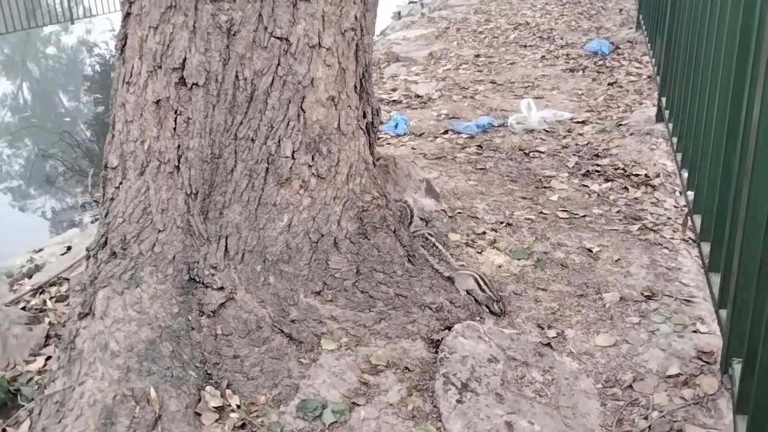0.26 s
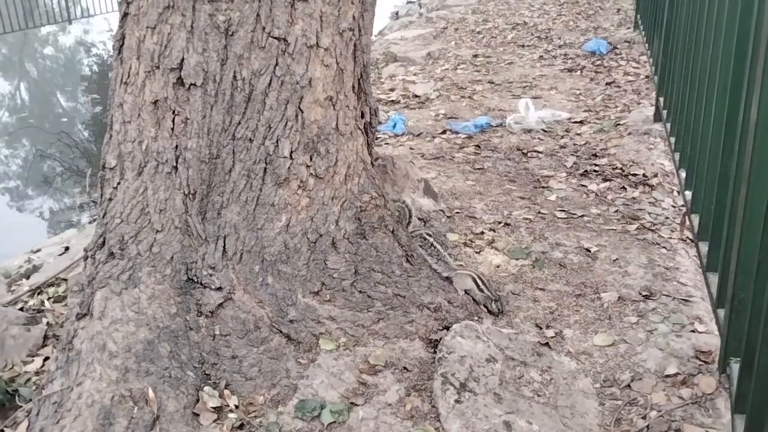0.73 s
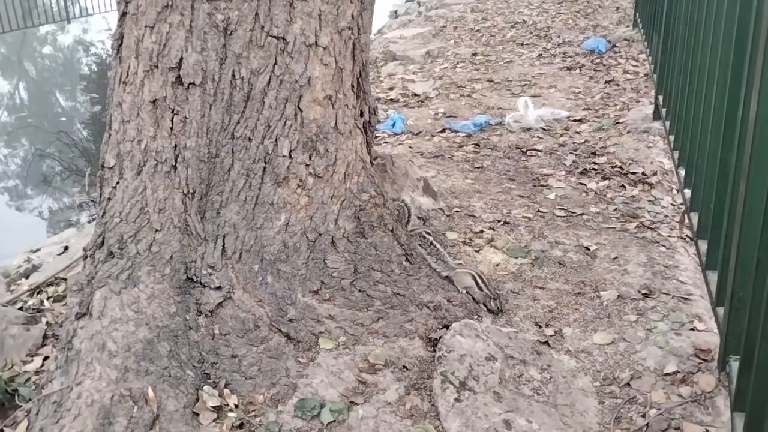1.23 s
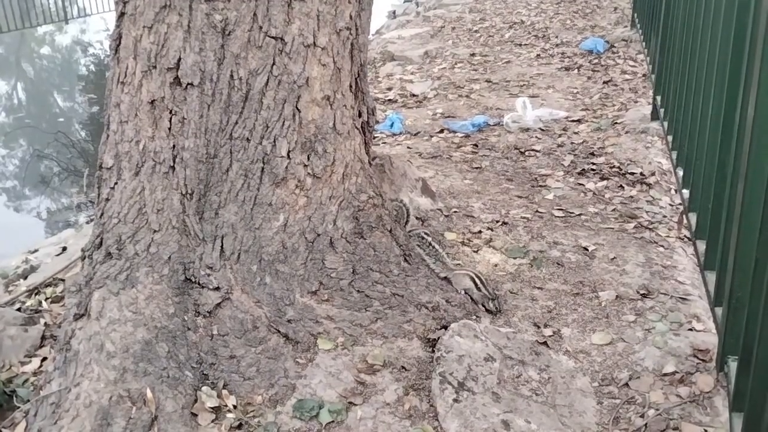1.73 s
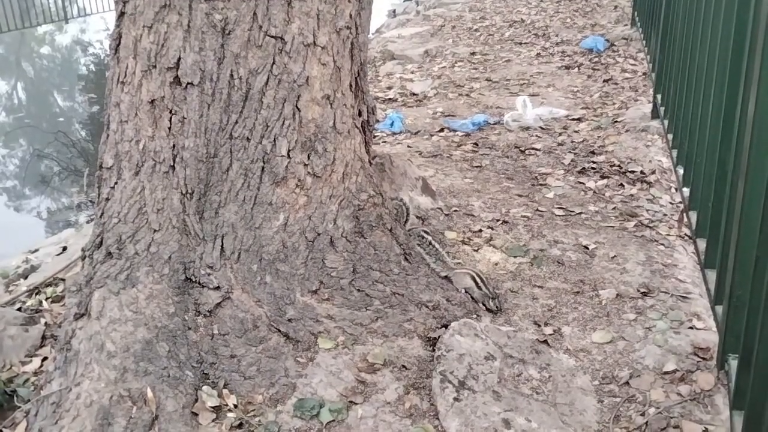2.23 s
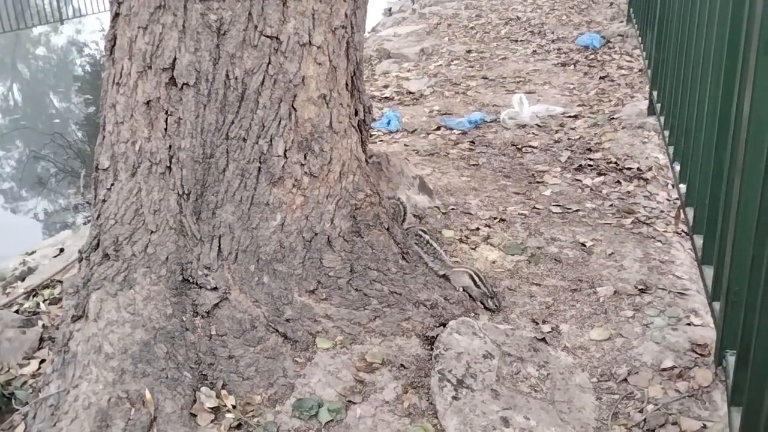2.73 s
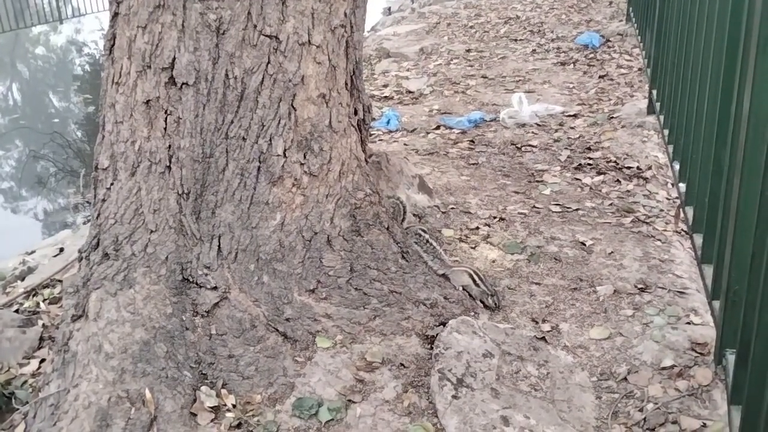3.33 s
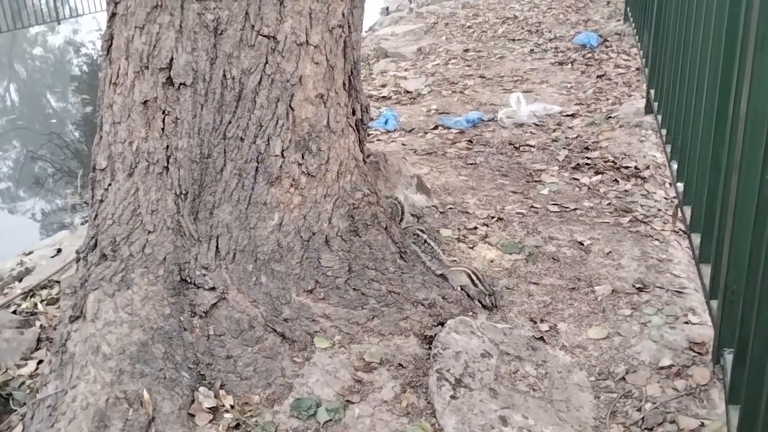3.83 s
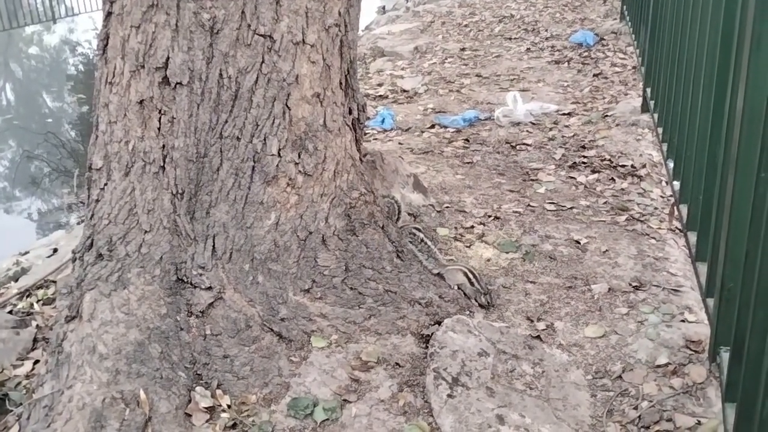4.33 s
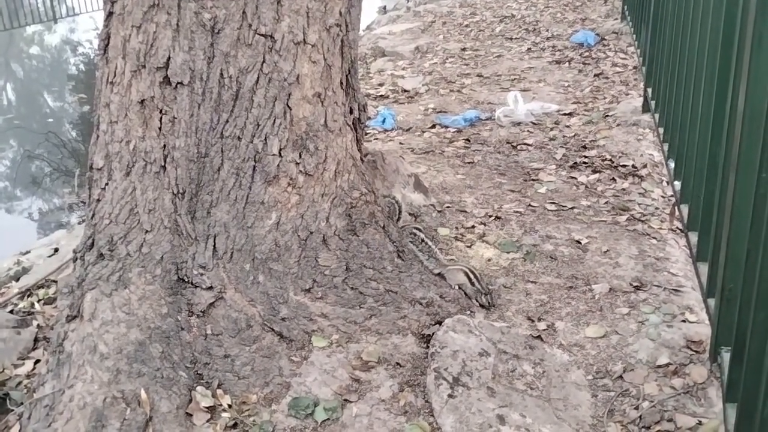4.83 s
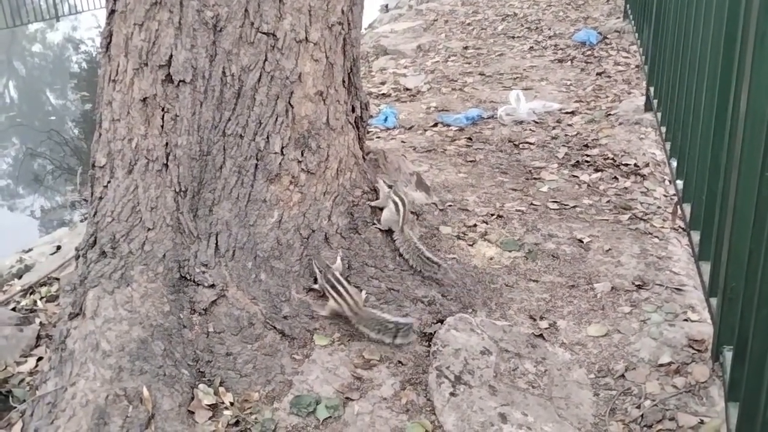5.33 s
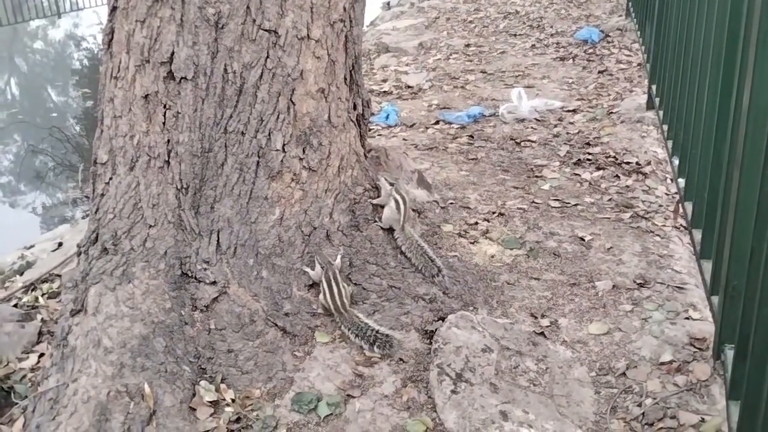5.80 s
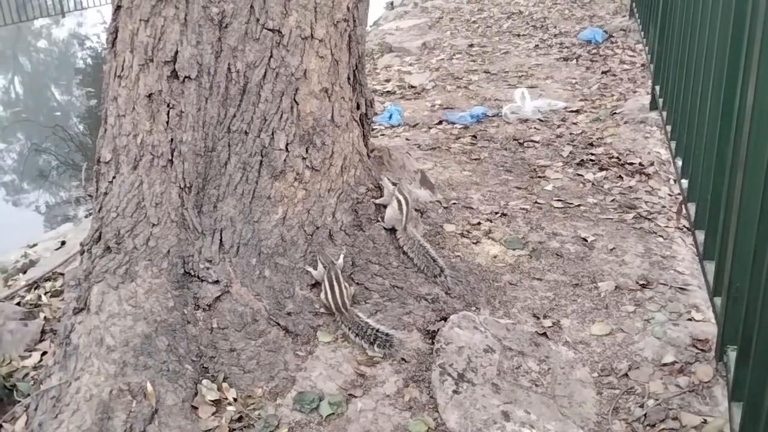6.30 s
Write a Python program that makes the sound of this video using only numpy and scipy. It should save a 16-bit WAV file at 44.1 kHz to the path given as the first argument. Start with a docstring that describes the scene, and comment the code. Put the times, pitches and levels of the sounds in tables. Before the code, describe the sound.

Squirrels chirp close to the microphone throughout, at the foot of a tree in a park. Each chirp is short, sharp and very high, sweeping upward with a slight echo. They come mostly in pairs a tenth of a second apart, roughly every half second, the second usually louder. A faint thin hiss comes and goes before 0.7 seconds. At about 0.9 seconds a bird in the treetops gives a whistle and a hoarse screech. From 2 to 3.5 seconds the birds, probably parakeets, screech in an overlapping run, a little quieter than the squirrels. Thin falling whistles follow at 3.7 and 4.2 seconds, with more screeches until about 4.8. A few soft, distant peeps sound from 5.5 seconds on, and claws tick lightly on bark near 6.4. A faint blur of far birds and a low city rumble continue underneath.

```python
"""A park, at the foot of a tree. Palm squirrels near the microphone chirp in sharp pairs, each chirp a
blip that jumps an octave into a rising sweep, scattered by trunks and a fence; claws tick on the bark.
Up in the trees birds, probably parakeets, whistle, peep and screech, their voices roughened by a second
vibration and puffs of air. Farther off lie a blur of birds and a low city rumble, and a thin hiss
comes and goes near the start."""
import sys
import numpy as np
from scipy import signal
from scipy.fft import rfft, irfft, next_fast_len
from scipy.io import wavfile
from scipy.ndimage import uniform_filter1d

SR = 44100
rng = np.random.default_rng(int(sys.argv[2]) if len(sys.argv) > 2 else 0)


def put_to_file(sound):
    """Save the sound as 16-bit audio at rate SR, in the file named by the first command-line argument."""
    columns = np.atleast_2d(sound).T  # one column per channel
    safe = np.clip(columns, -1, 1)
    whole_steps = np.round(safe * 32767)
    wavfile.write(sys.argv[1], SR, whole_steps.astype(np.int16))


N = 289296
BAND_LIMIT_HZ = 15950


def gain_of(db):
    """Decibels to amplitude."""
    return 10 ** (np.asarray(db) / 20)


def unit_rms(x):
    """Scales x to rms 1."""
    return x / np.sqrt(np.mean(x ** 2) + 1e-20)


def value_at(table, hz):
    """Reads a table of (Hz, value) on a log-frequency axis."""
    table_hz, value = np.transpose(table)
    return np.interp(np.log(hz + 1), np.log(table_hz + 1), value)


def add(mix, start_s, sound):
    """Mixes a sound in at start_s, which may lie before zero."""
    start = round(start_s * SR)
    sound = sound[max(-start, 0):]
    part = mix[max(start, 0):][:len(sound)]
    part += sound[:len(part)]


def coloured(x, spectrum):
    """Filters x by a table of (Hz, dB)."""
    size = next_fast_len(len(x) + 256)
    response = gain_of(value_at(spectrum, np.fft.rfftfreq(size, 1 / SR)))
    return irfft(rfft(x, size) * response, size)[:len(x)]


def wash(spectrum, levels, patchy_db):
    """Noise with drifting patches in time and frequency, following a curve of (s, dB)."""
    frames, hz = N // 256 + 5, np.fft.rfftfreq(1024, 1 / SR)
    real, imag, patches = rng.standard_normal((3, frames, 513))
    patches = unit_rms(uniform_filter1d(uniform_filter1d(patches, size=12, axis=0), size=7, axis=1))
    bins = (real + 1j * imag) * gain_of(value_at(spectrum, hz) + patchy_db * patches)
    noise = signal.istft(bins.T, nperseg=1024, noverlap=768)[1][:N]
    return unit_rms(noise) * gain_of(np.interp(np.arange(N) / SR, *np.transpose(levels)))


# The city as heard from inside the park. Each row: frequency in Hz, relative level in dB.
CITY_SPECTRUM = [(20, -41), (45, -1.5), (90, 4.5), (140, 2), (200, -5.5), (280, -9.5), (420, -14.5),
                 (700, -14), (1200, -6.5), (3000, -59.5), (7000, -98.5), (16000, -27.5)]
# Its slow rise and fall. Each row: time in seconds, relative level in dB.
CITY_LEVELS = [(0, -62), (1.8, -62.5), (3.05, -57.5), (4.8, -64), (6.56, -64.5)]
def city_rumble():
    """The city's low rumble swells a little and sinks back."""
    return gain_of(1) * wash(CITY_SPECTRUM, CITY_LEVELS, patchy_db=2.5)


# Birds far from the microphone. Each row: frequency in Hz, relative level in dB.
FAR_BIRD_SPECTRUM = [(500, -20), (800, -13), (1000, -2.5), (1300, -0.5), (1900, 1), (2500, -4), (3400, -11),
                     (4300, -19.5), (6000, -28), (9000, -42), (16000, -56)]
# Their swells and lulls. Each row: time in seconds, relative level in dB.
FAR_BIRD_LEVELS = [(0, -52), (.3, -55.5), (.5, -60), (.6, -56), (1.15, -53), (1.52, -58), (1.65, -53),
                   (1.85, -56.5), (2.1, -51.5), (2.6, -50.5), (3.401, -66), (4.55, -52.5), (5.6, -67.5),
                   (5.76, -61), (6.56, -59.5)]
def far_birds():
    """Distant calls blur into a patchy midrange noise."""
    return gain_of(2) * wash(FAR_BIRD_SPECTRUM, FAR_BIRD_LEVELS, patchy_db=4)


# The bright colour of the hiss and of the claws. Each row: frequency in Hz, relative level in dB.
BRIGHT_SPECTRUM = [(4000, -7.5), (7000, -8), (10500, -11.5), (11800, 6.5), (14000, 6.5), (15800, 11)]
def thin_hiss():
    """A brief high hiss swells, holds and dies away."""
    start_s, attack_s, hold_s, release_s = .15, .13, .3, .099
    t = np.arange(N) / SR - start_s
    faded = np.maximum(1 - t / attack_s, 0) + np.maximum(t - attack_s - hold_s, 0) / release_s
    return wash(BRIGHT_SPECTRUM, levels=[(0, -42)], patchy_db=.7) * gain_of(-41 * faded)


# Claws on the tree. Each row: start in seconds, opening level in dB.
CLAW_TICKS = [(0.7472, -62), (6.3769, -43), (6.4288, -50)]
def claws():
    """Claws catch on the bark in tiny bright ticks."""
    out, t = np.zeros(N), np.arange(SR // 50) / SR
    for start_s, level_db in CLAW_TICKS:
        noise = unit_rms(coloured(rng.standard_normal(len(t)), BRIGHT_SPECTRUM))
        add(out, start_s, gain_of(level_db) * noise * np.exp(-t / .00091))
    return out


# The echo among the trees around the microphone. Each row: frequency in Hz, seconds to fall 60 dB.
GROVE_DECAY = [(500, 0.077), (2000, 0.37), (5000, 0.29), (9000, 0.34), (11000, 0.38), (15000, 0.088)]
def grove_tails(count):
    """Echo tails of energy 1: reflections off trunks and fence grow denser as they die away."""
    age = np.arange(SR * 3 // 4) / SR
    density = np.minimum(.012 + age, .1)
    shape = (count, len(age))
    reflections = rng.choice([-1., 1.], shape) * (rng.random(shape) < density) / np.sqrt(density)
    hz, t, bins = signal.stft(reflections, SR, nperseg=256)
    build_up = 1 - np.exp(-t / .005)
    decay = gain_of(-60 * t / value_at(GROVE_DECAY, hz)[:, None])
    tails = signal.istft(bins * build_up * decay, SR, nperseg=256)[1]
    return tails / np.linalg.norm(tails, axis=1, keepdims=True)


def echoed(x, tail, wet_db):
    """The direct sound reaches the microphone, followed by its echo."""
    return np.pad(x, (0, len(tail) - 1)) + gain_of(wet_db) * signal.fftconvolve(x, tail)


# The colour of a bird's overtones at the beak. Each row: frequency in Hz, relative level in dB.
BEAK_SPECTRUM = [(600, -47), (1100, -10.5), (1600, 8.5), (3200, -1), (4300, 2), (5600, 0.5), (6700, 1),
                 (8000, 3), (9000, -16.5), (10100, -24.5), (11200, -16.5), (12600, -21.5), (15500, -31)]
def bird_voice(hz, throat_hz, level_db, rough, overtones_db):
    """As a voice roughens, a second vibration splits each partial, pitch jitters, air puffs through."""
    rough = np.clip(rough, 0, 1)
    shake, air, strain = rng.standard_normal((3, SR))[:, :len(hz)]
    jitter = unit_rms(uniform_filter1d(shake, size=90))
    phase = 2 * np.pi * np.cumsum(hz * (1 + .0464 * rough * jitter)) / SR
    buzz_hz = 325 * (1 + .02 * jitter)
    split = 2.8 * rough * np.sin(2 * np.pi * np.cumsum(buzz_hz) / SR)
    tone = sum((k * hz < BAND_LIMIT_HZ) * np.cos(k * phase + np.sqrt(k / 2) * split)
               for k in range(1, 12))
    puffs = air * (1 + 1.2 * np.cos(phase))
    drive = (1 - rough) * unit_rms(tone) + .65 * rough * unit_rms(puffs)
    throat = unit_rms(resonate(drive, throat_hz, width_hz=1070))
    overtones = gain_of(overtones_db) * unit_rms(coloured(drive, BEAK_SPECTRUM))
    flutter_db = 5 * rough * unit_rms(uniform_filter1d(strain, size=500))  # strain makes uneven bursts
    return (throat + overtones) * gain_of(level_db + flutter_db) * signal.windows.tukey(len(hz), .08)


def resonate(x, hz, width_hz):
    """A steep resonance that follows the curve hz."""
    carrier = np.exp(2j * np.pi * np.cumsum(hz) / SR)
    pole = np.exp(-np.pi * width_hz / SR)
    return 2 * (carrier * signal.lfilter([(1 - pole) ** 2], [1, -2 * pole, pole ** 2], x / carrier)).real


# Peeps from far off in the trees. Each row: start in seconds, length in seconds, pitch in Hz,
# glide as a share of the pitch, relative level in dB.
FAR_PEEPS = [(5.529, 0.045, 2230, -0.19, -50), (5.99, 0.071, 2694, -0.051, -59),
             (6.076, 0.0414, 3360, 0.142, -55), (6.463, 0.02, 3347, 0.022, -51)]
def peep(start_s, length_s, pitch_hz, glide, level_db):
    """A soft short note on a straight glide."""
    progress = np.arange(0, length_s, 1 / SR) / length_s
    hz = pitch_hz * (1 + glide * (progress - .5))
    return start_s, np.sin(np.pi * progress) * bird_voice(hz, hz, level_db, rough=.44, overtones_db=-23.5)


# Whistles from the treetops. Each row: time of the downward turn, lead-in and fall, all in seconds,
# top pitch in Hz, relative level in dB, roughness from 0 to 1, relative overtone level in dB.
TREETOP_WHISTLES = [(0.888, 0.017, .1, 4870, -45.5, 0.4, -11.5), (3.742, .068, 0.17, 5430, -39, 0.04, -18),
                    (4.233, 0.098, 0.18, 5490, -40.5, 0, -20.5)]
def whistle(turn_s, lead_s, fall_s, top_hz, level_db, rough, overtones_db):
    """A thin high note swells, turns with an accent, slides to a sagging shelf and breaks hoarsely."""
    shelf_hz, lead_rise_hz, sag_hz_per_s, break_hz = 3303, 705, 2500, 1605
    accent_s, slide_s, strain_s, break_s = .003, .028, .073, .03
    t = np.arange(-lead_s, fall_s, 1 / SR)
    early = (np.minimum(t, 0) / lead_s) ** 2
    age = np.maximum(t, 0)
    high = np.exp(-(age / slide_s) ** 1.5)
    broken = np.exp((t - fall_s) / break_s)
    hz = shelf_hz + (top_hz - shelf_hz) * high - lead_rise_hz * early
    hz = hz - sag_hz_per_s * age - break_hz * broken
    effort_db = level_db - 8.5 * np.exp(-age / accent_s) - 9 * early - 19 * broken
    strain_db = 14.5 * (np.exp(-(age / strain_s) ** 2) - early)  # overtones are strongest at the turn
    return turn_s - lead_s, bird_voice(hz, hz, effort_db, rough + .25 * broken, overtones_db + strain_db)


# Screeches from the treetops. Each row: start and length in seconds, pitch in Hz, share the pitch falls,
# throat resonance in Hz, relative level in dB, opening boost or dip in dB, roughness from 0 to 1,
# relative overtone level in dB.
TREETOP_SCREECHES = [(0.904, 0.2, 1329, 0.061, 1240, -41.5, -9, 0.7, -11.5),
                     (0.934, .13, 1626, .12, 3290, -42, 8, 0.52, -5),
                     (2.072, 0.33, 1390, 0.26, 2920, -42, -18.5, 0.79, -5),
                     (2.285, 0.085, 2066, 0.19, 2230, -35.5, -11, 0.54, -10),
                     (2.304, 0.26, 1560, 0.11, 3060, -32.5, -6.5, 0.49, -10),
                     (2.509, 0.14, 1844, 0, 1920, -33, -12, 0.54, -2.5),
                     (2.61, 0.18, 1604, 0.085, 4340, -39.5, -4.5, 0.69, 8),
                     (2.722, 0.124, 1490, 0.013, 3300, -30.5, -7.5, 0.37, -7),
                     (2.751, .13, 1339, 0.0078, 3800, -38.5, 4, 0.08, 2),
                     (2.814, 0.12, 1332, 0.098, 2980, -34, -3, 0.39, -1),
                     (2.923, 0.085, 1026, 0.088, 2140, -42.5, 7, 0.3, -26),
                     (3.098, .15, 1686, 0.031, 1590, -34.5, -13, 0.56, -12),
                     (3.177, 0.2, 1577, 0.0095, 3060, -33, -10, 0.44, -6.5),
                     (3.313, 0.094, 1423, 0.0015, 2980, -39.5, 9, 0.48, -8.5),
                     (3.394, 0.11, 1158, 0.17, 2280, -45.5, -7, 0.25, -9),
                     (3.933, 0.19, 1315, 0.042, 3700, -57.5, 2.5, .4, 3.5),
                     (4.004, .19, 1342, 0.021, 1340, -51, -0.5, 0.35, -4),
                     (4.356, 0.11, 1480, 0, 3030, -37.5, -6, 0.37, -2),
                     (4.446, .24, 1599, .12, 3240, -38, 1.5, .45, -5.5),
                     (4.55, 0.1, 1550, .03, 1450, -36.5, -1, 0.22, -33),
                     (4.678, 0.16, 1740, 0.12, 1570, -45.5, -9, 0.59, 10)]
def screech(start_s, length_s, pitch_hz, fall, throat_hz, level_db, opening_db, rough, overtones_db):
    """A harsh call scoops up, wavers, then loses pitch and strength; the throat follows the pitch."""
    attack_s, release_s, scoop_s, waver_hz = .012, .011, .0344, 14
    t = np.arange(0, length_s, 1 / SR)
    fresh, spent = (1 - t / length_s) ** 2.45, (t / length_s) ** 2.6
    waver = .0079 * np.sin(2 * np.pi * (waver_hz * t + rng.random()))
    bend = 1 - .0406 * np.exp(-t / scoop_s) - fall * spent + waver
    envelope = np.minimum(t / attack_s, 1) * np.minimum((length_s - t) / release_s, 1)
    effort_db = level_db + opening_db * fresh - 8 * spent
    voice = bird_voice(pitch_hz * bend, throat_hz * bend, effort_db, rough, overtones_db)
    return start_s, envelope * voice


def treetop_birds():
    """Calls from high above the microphone arrive thin in the bass and about half as echo."""
    calls = np.zeros(N)
    for call, rows in (whistle, TREETOP_WHISTLES), (screech, TREETOP_SCREECHES), (peep, FAR_PEEPS):
        for row in rows:
            add(calls, *call(*row))
    thinned = coloured(calls, [(300, -15.5), (700, -13), (1100, -2.5), (8000, 3), (15000, -.5)])
    return gain_of(-4.5) * echoed(thinned, grove_tails(count=1)[0], wet_db=-.5)[:N]


# A squirrel's low and high chirp. Each row: top pitch in Hz; pause after the blip, glide time, swell time
# and blip half-length in seconds; blip rise as a share of its pitch; level of the blip's octave in dB.
LOW_AND_HIGH_CHIRP = [(9600, .003, .0035, .0046, .0018, .09, -6),
                      (10500, .0012, .004, .0082, .002, .04, -20)]
# The breathy edge that opens the sweep. Each row: frequency in Hz, gain in dB.
BREATH_SPECTRUM = [(3500, -30.5), (6000, -20.5), (9000, -6), (11500, -32), (14500, -10.5), (16000, -20)]
# The high sweep is beamed away from the microphone, so more of it arrives as echo.
# Each row: top pitch in Hz, echo against the direct sound in dB.
SWEEP_ECHO_LEVELS = [(9700, -.5), (10400, 4)]
def chirp(start_s, top_hz, blip_db, sweep_db, tail):
    """A short rising blip; with a breathy snap the voice jumps an octave and sweeps up to a ceiling."""
    tops, *columns = np.transpose(LOW_AND_HIGH_CHIRP)
    pause_s, glide_s, swell_s, half_s, rise, octave_db = (np.interp(top_hz, tops, c) for c in columns)
    t = np.arange(-SR // 100, SR // 25) / SR
    blip_hz = .4698 * top_hz * (1 + rise * np.tanh(t / half_s))
    phase = 2 * np.pi * np.cumsum(blip_hz) / SR
    blip = np.sin(phase) + gain_of(octave_db) * np.sin(2 * phase) + gain_of(-19.5) * np.sin(3 * phase)
    blip *= gain_of(blip_db) * (np.exp(-(t / half_s) ** 2) + .2 * np.exp(-(t / (2.5 * half_s)) ** 2))
    snap = coloured(rng.standard_normal(len(t)), BREATH_SPECTRUM)
    snap *= gain_of(blip_db + 2) * np.exp(-((t - pause_s) / .0045) ** 2)

    age = np.maximum(t - pause_s, 0)
    waver = .008 * unit_rms(uniform_filter1d(rng.standard_normal(len(t)), size=60))
    sweep_hz = top_hz * (1.004 - .25 * np.exp(-age / glide_s) + waver)
    phase = 2 * np.pi * np.cumsum(sweep_hz) / SR
    breath = coloured(rng.standard_normal(len(t)), BREATH_SPECTRUM)
    rasp = np.exp(-age / .006) * (gain_of(-15) * np.sin(2 * phase) + 2.46 * breath)
    envelope = age / swell_s * np.exp(.85 * (1 - (age / swell_s) ** 1.1))
    sweep = gain_of(sweep_db - 1) * envelope * (np.sin(phase) + rasp)
    sweep_wet_db = value_at(SWEEP_ECHO_LEVELS, top_hz)
    return start_s + t[0], echoed(blip + snap, tail, wet_db=-4.5) + echoed(sweep, tail, sweep_wet_db)


# Squirrels at the foot of the tree, near the microphone. Each row: time of the blip in seconds,
# top pitch of the sweep in Hz, relative levels of the blip and of the sweep in dB.
SQUIRREL_CHIRPS = [(-.012, 9600, -32.5, -26.5), (0.3914, 10460, -30, -36), (0.4845, 9650, -30.5, -24.5),
                   (0.837, 10570, -32, -38.5), (0.9138, 9490, -32, -23.5), (1.282, 10560, -29.5, -40.5),
                   (1.377, 9730, -30, -27.5), (1.76, 10500, -31, -39), (1.855, 9630, -33, -26.5),
                   (2.171, 10420, -30, -41), (2.259, 9370, -30.5, -25.5), (2.6888, 10390, -29.5, -37),
                   (2.778, 9650, -28.5, -24), (3.112, 10300, -32.5, -40), (3.3267, 10520, -31.5, -36.5),
                   (3.427, 9980, -32, -30), (3.8074, 10370, -27, -39), (3.9035, 9730, -34.5, -26),
                   (4.28, 10490, -27, -37), (4.3652, 9550, -32, -23), (4.71, 10570, -29.5, -40),
                   (4.7886, 9480, -33.5, -23), (5.1323, 10510, -33, -38.5), (5.2166, 9510, -31.5, -26.5),
                   (5.6041, 10480, -32, -40), (5.6858, 9570, -29, -22.5), (5.79, 9600, -33, -26.5),
                   (6.173, 10530, -32, -39.5), (6.2597, 9500, -29.5, -25.5)]
def squirrels():
    """Every chirp scatters differently as the animals turn their heads."""
    out = np.zeros(N)
    for row, tail in zip(SQUIRREL_CHIRPS, grove_tails(count=len(SQUIRREL_CHIRPS))):
        add(out, *chirp(*row, tail))
    return out


def scene():
    """Squirrels and birds over the park's background, all in the centre."""
    background = far_birds() + city_rumble() + thin_hiss()
    mix = background + squirrels() + treetop_birds() + claws()
    return np.array([mix, mix])


def record(dry):
    """The recorder cuts the treble above its band limit."""
    lowpass = signal.firwin(511, BAND_LIMIT_HZ, window=("kaiser", 9), fs=SR)
    return signal.oaconvolve(dry, lowpass[None], "same")


dry = scene()
out = record(dry)
put_to_file(out)
```